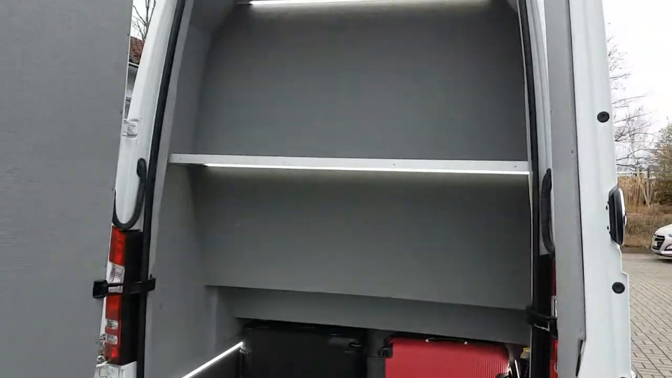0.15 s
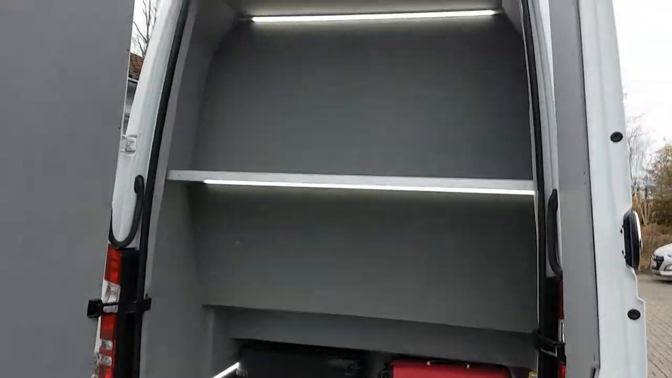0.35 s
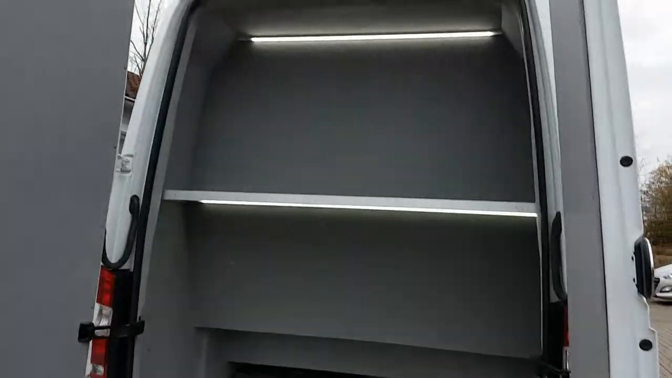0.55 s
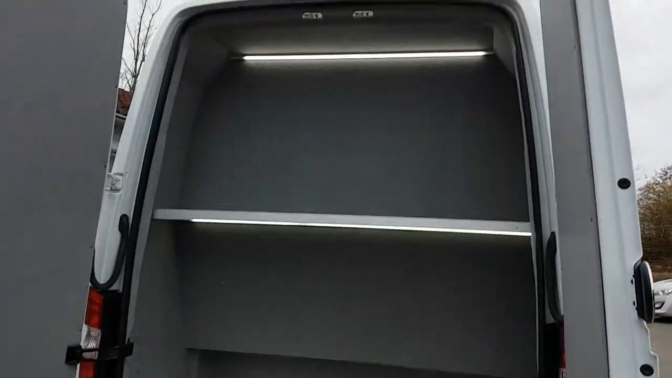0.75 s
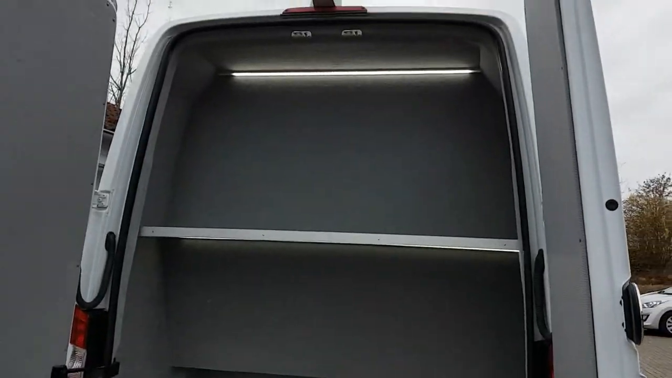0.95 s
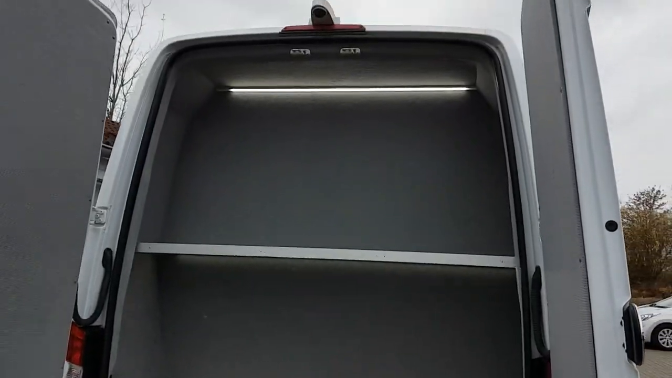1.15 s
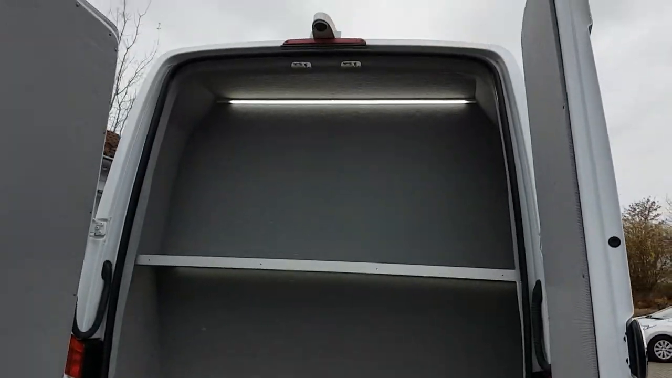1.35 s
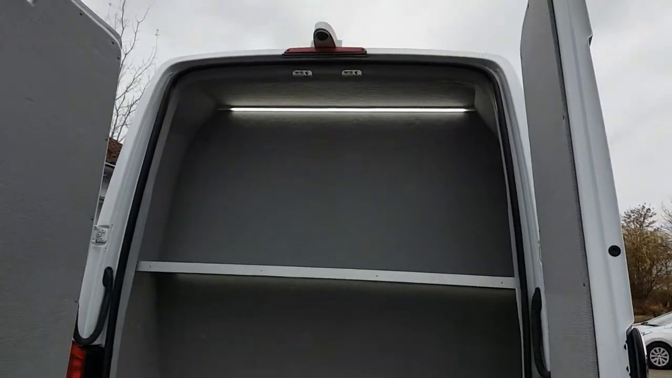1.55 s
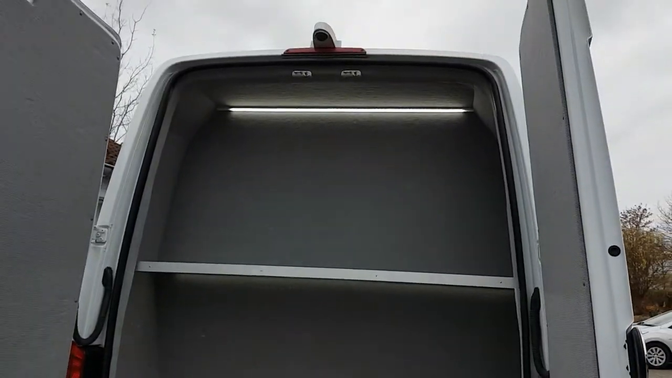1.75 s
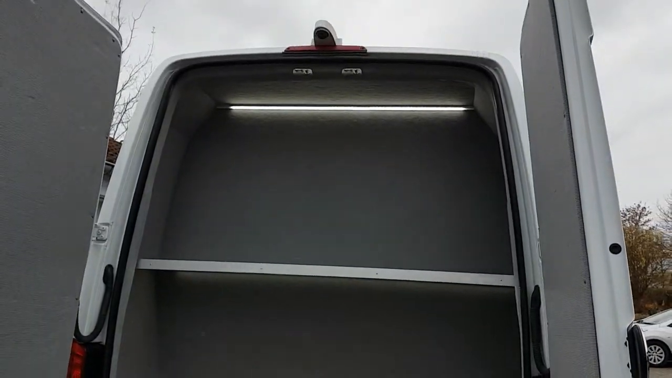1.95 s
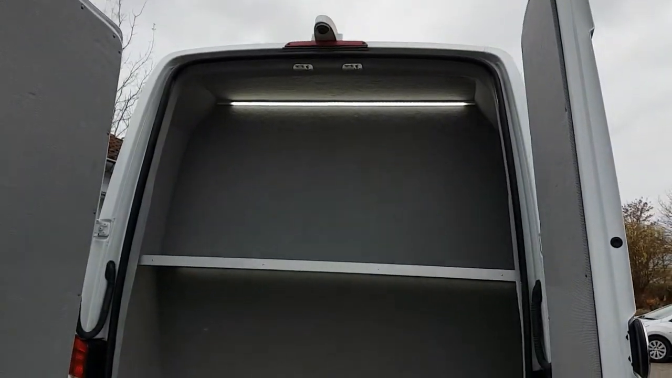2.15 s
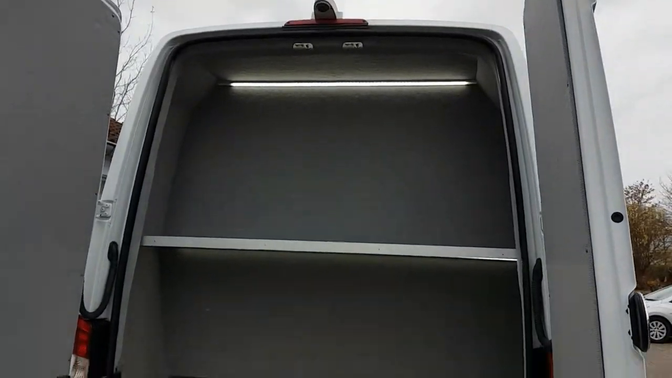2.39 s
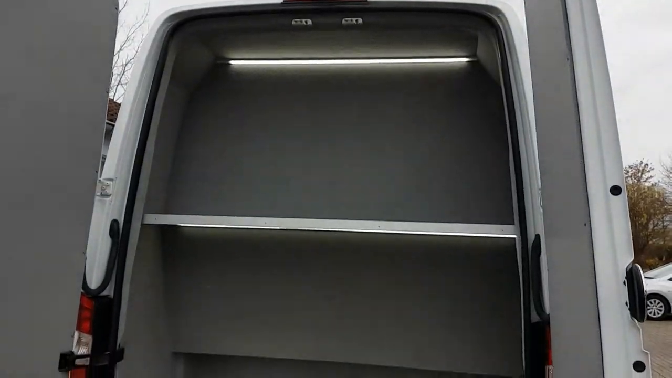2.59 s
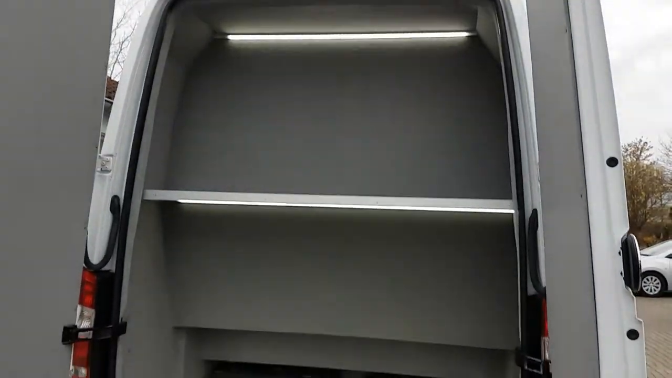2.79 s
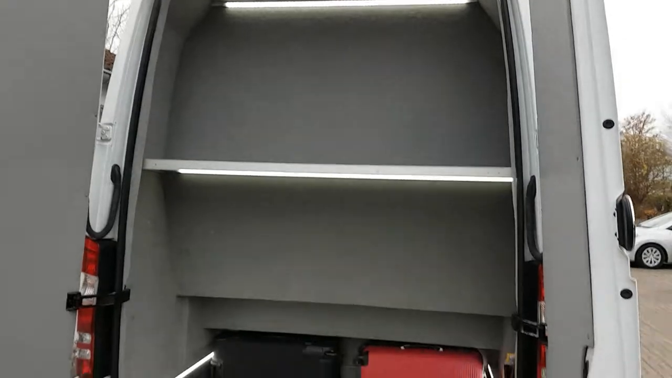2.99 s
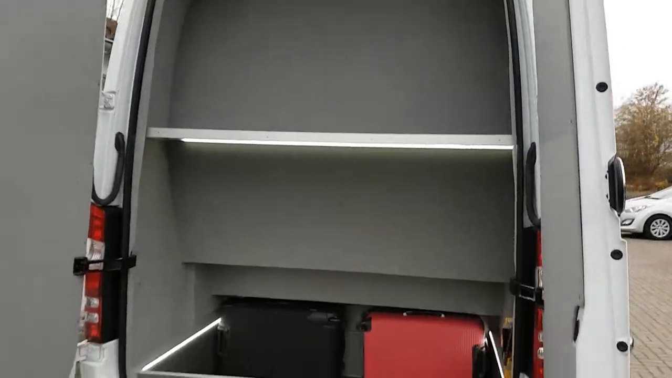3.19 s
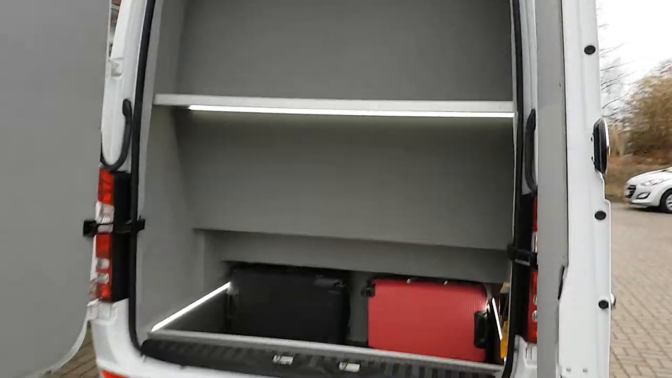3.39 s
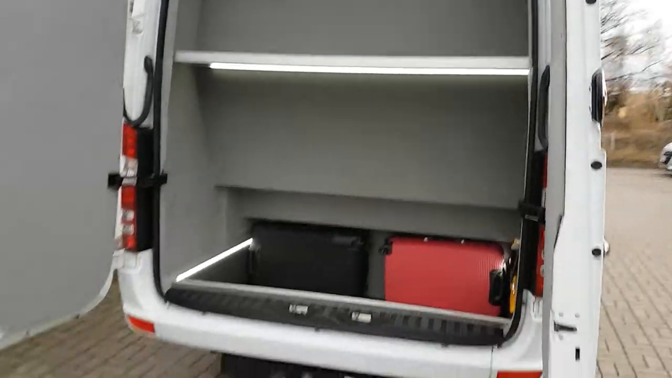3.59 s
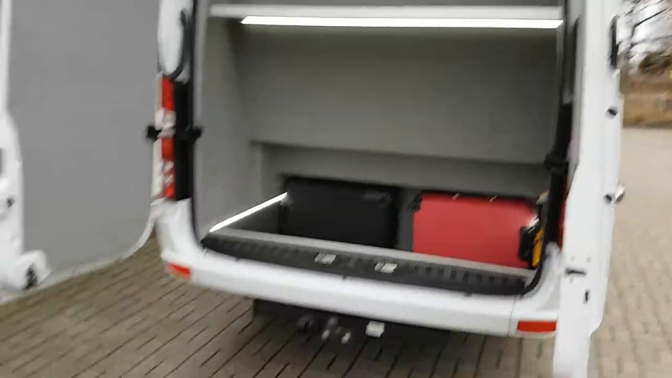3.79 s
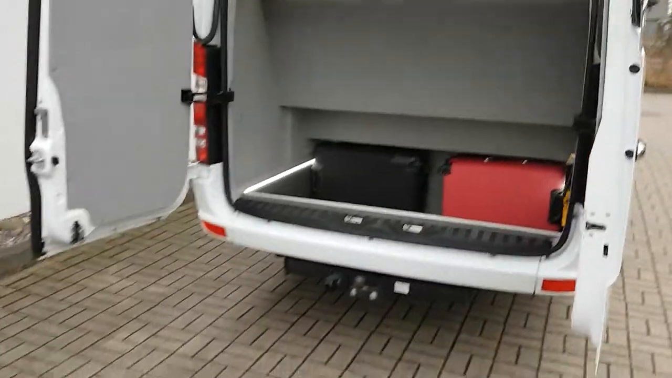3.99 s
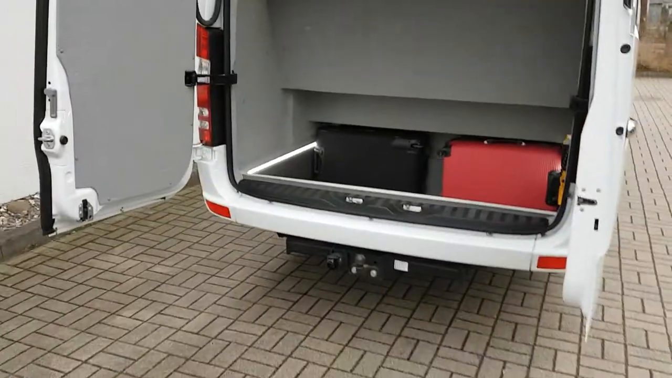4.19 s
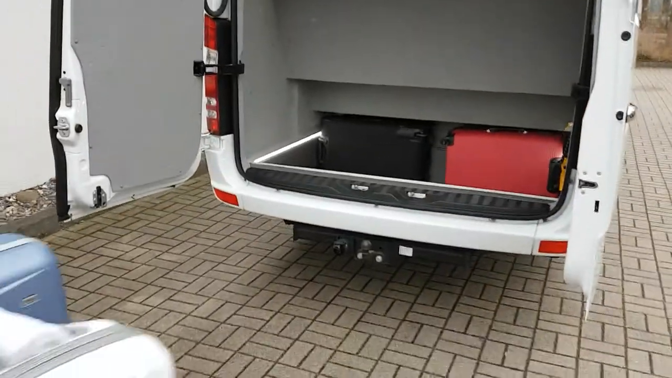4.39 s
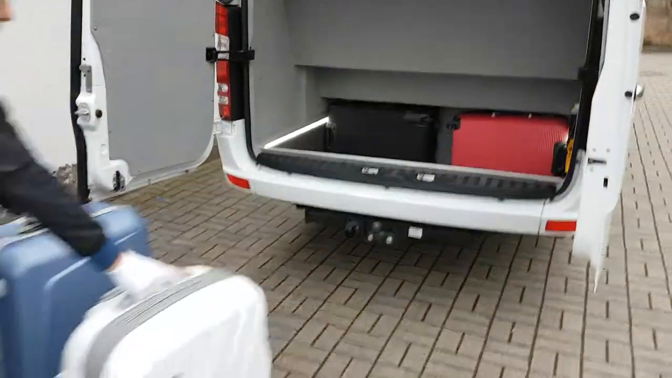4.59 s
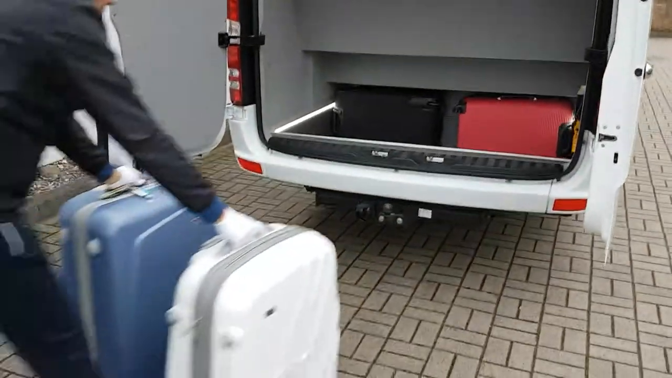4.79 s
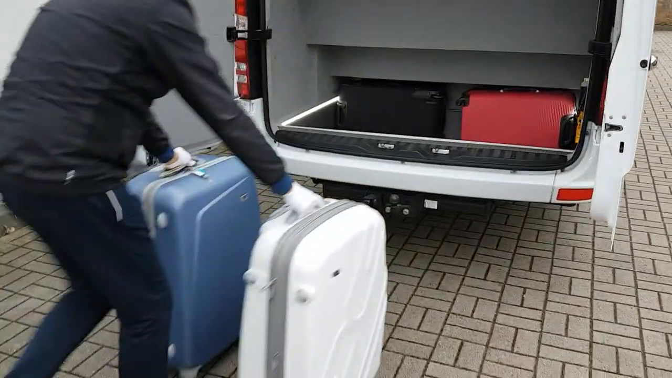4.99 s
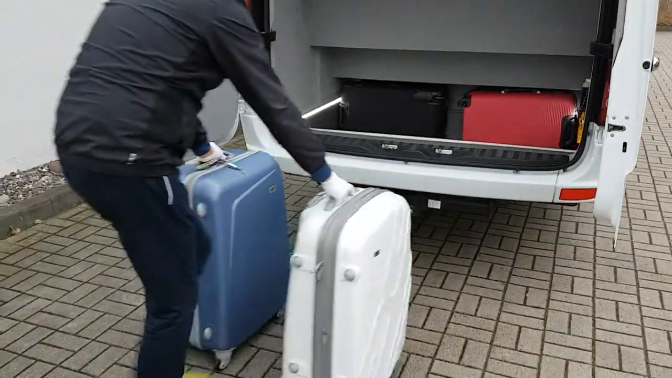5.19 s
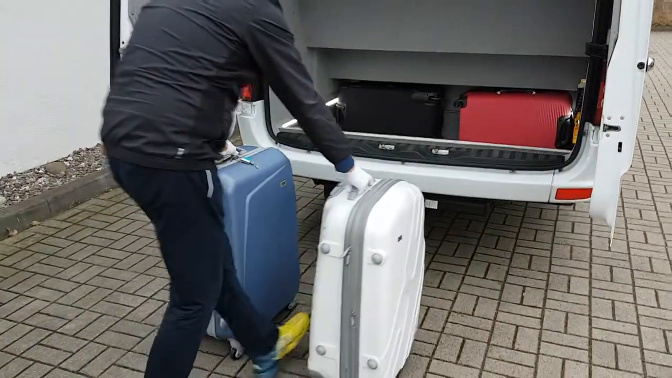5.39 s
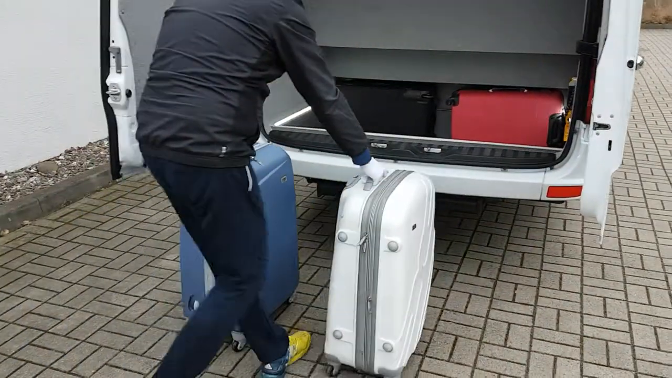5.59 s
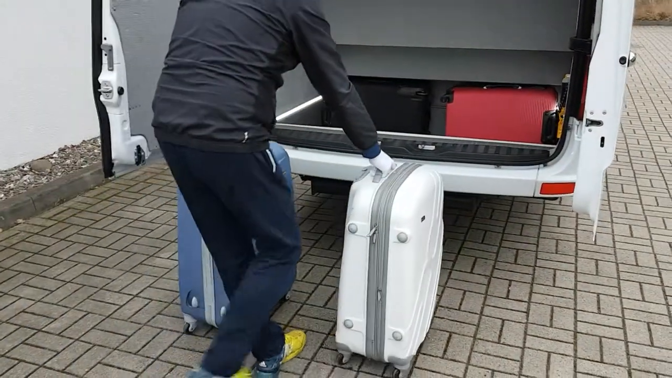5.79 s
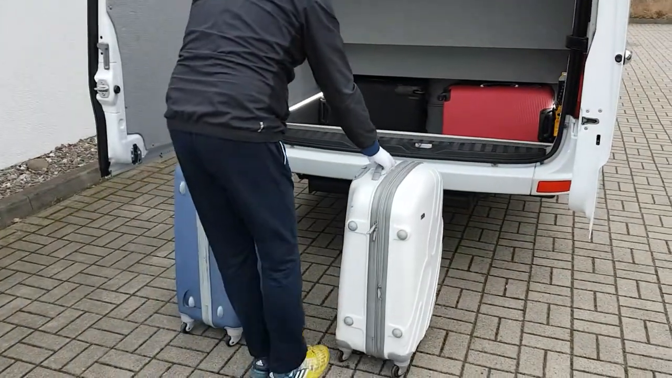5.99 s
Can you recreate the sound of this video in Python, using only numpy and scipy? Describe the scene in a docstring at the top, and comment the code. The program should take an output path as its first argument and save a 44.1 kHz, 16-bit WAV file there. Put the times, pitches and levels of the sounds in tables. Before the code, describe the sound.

Hard plastic suitcases roll over brick paving towards the microphone, hollow clattering and rattling building to a loud peak, then stopping beside an open van.

```python
"""Suitcases over brick paving

Outdoors beside an open van, two hard plastic suitcases roll over bricks towards a phone with two microphones.
Noise shaped by shell and air resonances drums and booms; joints add bursts of it with damped tones.
Loose parts tick as short noise and pings; a sole scuffs first, amid short damped knocks and one low swell.
A wheel whistles faintly, then one squeaks as a broken falling tone. A thin high tone sets in and slowly fades.
Far traffic hums as steady shaped noise, and the van and walls send back a short answer."""
import sys
import numpy as np
from scipy import signal
from scipy.fft import rfft, irfft, next_fast_len
from scipy.io import wavfile
from scipy.ndimage import uniform_filter1d, map_coordinates

SR = 44100
rng = np.random.default_rng(int(sys.argv[2]) if len(sys.argv) > 2 else 0)


def transcribe(u):
    """Save the signal u as a 16-bit wav file named by the first command-line argument.

    u: samples, shape (n,) or (channels, n), limited to [-1, 1]; the rate is SR.
    q: integer samples, one column per channel.
    """
    v = np.clip(np.atleast_2d(u).T, -1, 1)
    q = np.round(v * 32767).astype(np.int16)
    wavfile.write(sys.argv[1], SR, q)


N = 266805

# Levels of tables and settings are bases: each layer adds its own trim.
# Rolling between the knocks. Each row: time in seconds, drumming level in dB.
ROLL_LEVEL = [(0.8, -66), (0.93, -56), (1.12, -51), (1.33, -42), (1.59, -37.5), (1.78, -40.5), (2.13, -32),
              (2.53, -35.5), (2.94, -32.5), (3.2, -31.5), (3.78, -28), (3.9, -28.5), (4.12, -26.5),
              (4.47, -30.5), (4.9, -28), (5.68, -42), (5.82, -50.5), (6.05, -62.5)]
# The bass gains as the cases come close. Each row: time in seconds, boom over drumming in dB.
BOOM_OVER_DRUMMING = [(.8, -2), (1.3, -9.5), (1.9, -13), (2.2, -6), (3.3, -5), (3.7, -6), (4.2, 5),
                      (4.6, 6.5), (5.2, 5), (5.6, 13.5), (6.05, 10)]
# Wheels dropping into joints. Each row: start in seconds, level in dB, large-wall level over it in dB,
# upper-mode level over it in dB, rattle t60 in seconds.
JOINT_KNOCKS = [(0.881, -45, -1, -6.5, 0.18), (0.955, -46.5, 1, -4.5, 0.4), (1.0, -39, -0.5, -7, 0.38),
                (1.082, -28, -13, -17, 0.071), (1.153, -32.5, 2, -9.5, 0.12), (1.236, -27, -10, -11, 0.033),
                (1.249, -31.5, -23, -5, 0.15), (1.351, -22.5, -5.5, -10, 0.098),
                (1.383, -31, -9, -14, 0.076), (1.503, -26.5, -5.5, -3, 0.06), (1.598, -18.5, -9, -8, 0.038),
                (1.706, -30.5, 3, -5.5, 0.28), (1.748, -32.5, 0, -5.5, 0.34), (1.813, -20, -3, -15, 0.045),
                (1.896, -23, 1.5, -77, 0.071), (1.969, -16.5, -5, -6, 0.19),
                (1.981, -11.5, 3.5, -17, 0.037), (2.039, -26, 6, -7, 0.22), (2.152, -20.5, -6, -6.5, 0.067),
                (2.192, -30, 4, -10, 0.23), (2.256, -13.5, -17, -14.5, 0.12), (2.297, -17, -7, -20, 0.04),
                (2.391, -32, -14, 4, 0.05), (2.535, -14.5, -8.5, -10, 0.1), (2.66, -14, -9, -12.5, 0.066),
                (2.676, -18.5, -5, -6.5, 0.1), (2.748, -17, -25, -8, 0.075), (2.78, -11, -11.5, -11, 0.05),
                (2.794, -17.5, -7, -10.5, 0.26), (2.859, -25, -13, -11, 0.031),
                (2.915, -18.5, -2.5, -8, 0.33), (2.977, -12.5, -14, -13.5, 0.091),
                (3.086, -28, 5, -3.5, 0.13), (3.13, -12, -11.5, -11.5, 0.12),
                (3.161, -18.5, -2.5, -4, 0.11), (3.258, -17.5, -5.5, -8.5, 0.7),
                (3.274, -14, -15, -22, 0.066), (3.321, -22, -19, -10, 0.1),
                (3.363, -13.5, -10.5, -20, 0.13), (3.418, -24, -12, -8.5, 0.036),
                (3.511, -14.5, -4.5, -9.5, 0.1), (3.534, -20, -2.5, -2, 0.063),
                (3.591, -22, -0.5, -0.5, 0.045), (3.629, -18.5, -5.5, -10.5, 0.23),
                (3.683, -17, -5, -8.5, 0.42), (3.73, -20, 6, -21, 0.034), (3.873, -22, -8.5, 0, 0.15),
                (3.934, -19.5, 5, 2, 0.014), (4.075, -8.5, -14, -10, 0.12), (4.096, -17, -19, -10, 0.029),
                (4.12, -18.5, -2, -10, 0.11), (4.152, -14.5, -5, -6.5, 0.13),
                (4.194, -19.5, -3, -18, 0.042), (4.26, -12, -9, -10, 0.22),
                (4.306, -14.5, -4.5, -13.5, 0.097), (4.34, -22, -3, -22, 0.055),
                (4.444, -9.5, -11.5, -11.5, 0.34), (4.501, -13.5, -16, -10, 0.23),
                (4.543, -8, -31, -9, 0.12), (4.608, -18.5, -14, -9, 0.044), (4.659, -18.5, -16, -9, 0.63),
                (4.705, -17, -5, -8.5, 0.23), (4.743, -7.5, -11, -14, 0.026), (4.827, -21.5, -19, -3.5, 1),
                (4.908, -9, -15, -16, 0.026), (4.952, -23.5, -20, -6, 0.16), (5.014, -12.5, -15, -9, 0.26),
                (5.072, -12.5, -9, -4, 0.025), (5.114, -34, -10, 1, 0.058), (5.189, -13.5, -9.5, -7, 0.11),
                (5.293, -24, -19, -10, 0.14), (5.33, -13, -13.5, -7.5, 0.078),
                (5.408, -22.5, -10, -7, 0.24), (5.463, -18, -5, -5, 0.05), (5.603, -20, -11.5, -10, 0.14),
                (5.627, -12, -8, -13, 0.041), (5.723, -32, -8, -7, 0.047), (5.775, -27.5, -4, -1.5, 0.049),
                (5.836, -30, -6.5, -6, 0.087), (5.987, -44, 0, 6, 0.038), (6.015, -40, 2.5, 3, 0.29)]
# Loose handle and caster parts. Each row: start in seconds, level in dB, glint level in dB, pitch in Hz.
PART_TICKS = [(0.3351, -54, -58, 7800), (0.8824, -48, -71, 6630), (0.9796, -48, -56, 3220),
              (1.0374, -49, -56, 6240), (1.073, -48, -58, 3000), (1.1104, -59, -56, 3250),
              (1.2624, -52, -63, 2860), (1.2874, -61, -66, 2800), (1.3538, -52, -46, 3040),
              (1.4524, -48, -52, 3080), (1.5035, -49, -50, 2810), (1.575, -36, -58, 6270),
              (1.704, -28.5, -42, 2640), (1.7622, -29, -40, 5560), (1.8114, -26.5, -36, 5540),
              (1.9136, -23.5, -37, 6700), (1.9721, -18.5, -31, 2870), (1.9899, -20, -30, 6540),
              (2.075, -27, -32, 7520), (2.1191, -28, -38, 5370), (2.14, -24.5, -38, 6000),
              (2.1544, -33, -38, 7680), (2.1987, -25, -35, 3000), (2.256, -30, -40, 8150),
              (2.299, -22.5, -34, 4460), (2.394, -21.5, -50, 6540), (2.563, -31, -40, 5580),
              (2.617, -27.5, -43, 3040), (2.659, -29, -48, 8600), (2.7762, -27, -37, 2920),
              (2.95, -21, -32, 6440), (2.9752, -22.5, -27, 3070), (3.097, -24, -37, 5310),
              (3.13, -21, -35, 2950), (3.1632, -19.5, -33, 3140), (3.264, -15.5, -30, 8060),
              (3.3228, -38, -46, 2900), (3.365, -15, -30, 3140), (3.532, -28, -35, 3060),
              (3.5914, -17.5, -30, 5240), (3.625, -23, -35, 2950), (3.694, -20, -28, 2870),
              (3.727, -23, -28, 3280), (3.777, -26, -34, 3040), (3.798, -16, -23, 8150),
              (3.8726, -21, -49, 8670), (3.908, -17, -23, 5330), (4.007, -12.5, -25, 5700),
              (4.0824, -21, -31, 3030), (4.1195, -15.5, -27, 3200), (4.1914, -12.5, -26, 5530),
              (4.2517, -18, -30, 8700), (4.278, -13, -20, 7900), (4.343, -16, -28, 5530),
              (4.368, -18, -27, 8400), (4.4562, -15, -24, 7300), (4.478, -21, -32, 9600),
              (4.5022, -18, -28, 3360), (4.549, -15, -29, 3000), (4.605, -24, -31.5, 6580),
              (4.6813, -19, -30, 4230), (4.7056, -17, -28, 5500), (4.7446, -12.5, -27, 3320),
              (4.8493, -11, -26, 3200), (4.8808, -18, -27, 5470), (4.908, -16.5, -28, 6300),
              (4.954, -12.5, -21.5, 3240), (4.96, -9.5, -37, 6360), (4.984, -24.5, -47, 3320),
              (5.016, -18.5, -32, 2920), (5.0688, -12, -23, 5670), (5.147, -19, -34, 2790),
              (5.1906, -14.5, -20, 3180), (5.2273, -21, -40, 4980), (5.2944, -21, -29.5, 5700),
              (5.4085, -16, -25, 4800), (5.465, -16, -26.5, 5600), (5.678, -31.5, -40, 5100),
              (5.7736, -19.5, -29, 9700), (6.0134, -31, -50, 3300), (6.03, -24.5, -50, 8400)]
# Short knocks of a case, and one soft low swell at 0.66 s.
# Each row: start in seconds, level in dB, pitch in Hz, t60 in seconds.
DAMPED_TONES = [(0.3017, -28, 620, 0.013), (0.622, -38.5, 448, 0.04), (0.642, -41, 490, 0.033),
                (.66, -51, 79.4, .3), (0.889, -31.5, 467, 0.04), (.929, -29.5, 480, 0.028)]
# A wheel squeaks. Each row: time in seconds, pitch in Hz, level in dB, octave over it in dB.
WHEEL_SQUEAK = [(4.012, 3020, -62, 0), (4.022, 2940, -28, 0), (4.035, 2935, -28, -14),
                (4.047, 3010, -26, -21), (4.056, 2330, -19, -25), (4.064, 2400, -66, -18)]
# A wheel whistles faintly. One row: start in seconds, end in seconds, pitch in Hz, level in dB.
WHEEL_WHISTLE = (1.37, 1.46, 7500, -51)
# A sole on the bricks. Each row: time in seconds, level in dB.
SCUFF_LEVEL = [(.29, -88.5), (.31, -58), (.36, -70), (.4, -52), (.44, -49.5), (.47, -57), (.52, -75)]
# A thin high tone. Each row: pitch in Hz, rms level in dB at 0.3 s on its fading slope.
THIN_TONE = [(11192, -86)]
# Air in the cases. Each row: pitch in Hz, width in Hz, relative level in dB.
AIR_MODES = [(60.6, 34, -15), (79.2, 11.4, -2), (122.6, 26.4, -2), (169, 23, -2.5), (221, 37, -5.5)]
# Walls of the cases. Each row: pitch in Hz, width in Hz, relative level in dB.
WALL_MODES = [(290.2, 32.4, -2), (361.4, 49, -3), (481, 119, -4.5), (664, 166, -3), (754, 154, -2),
              (998, 296, -6), (1483, 560, -9.5), (1998, 280, -8), (2168, 334, -9), (2418, 412, -15),
              (2943, 530, -27)]
# The smallest metal parts. Each row: pitch in Hz, width in Hz, relative level in dB.
SMALL_PART_MODES = [(13750, 270, -27), (14360, 170, 11)]
# Colour of the grit. Each row: frequency in Hz, relative density in dB.
GRIT_COLOUR = [(1650, -38), (2800, -8), (3280, -6), (3630, -19), (3910, -11), (5610, -4.5), (7550, -8),
               (8730, -7), (11700, -13), (14500, -8.5), (15800, -19.5)]
# Colour of the dragging sole. Each row: frequency in Hz, relative density in dB.
SOLE_COLOUR = [(470, -42), (800, -5), (1440, -7), (2020, 1.5), (2630, -15), (8340, -19.5), (16000, -28)]
# Colour of the far traffic. Each row: frequency in Hz, relative density in dB.
TRAFFIC_COLOUR = [(12, -40), (20, -5), (32, -5.5), (71, -7.5), (164, -13.5), (390, -10.5), (929, -11.5),
                  (1340, -11), (2200, -19.5), (2700, -29.5), (9250, -40), (16200, -34)]
# The cases across the two microphones. Each row: frequency in Hz, left-right correlation.
NEAR_ALIKE = [(60, 0.99), (300, 1), (700, 0.99), (1400, 0.65), (2300, 0.62), (3500, 0.1), (6000, 0.093),
              (15000, 0.052)]
# Traffic and sole across the two microphones. Each row: frequency in Hz, left-right correlation.
FAR_ALIKE = [(60, 0.34), (240, 0.83), (950, 0.34), (3770, -0.056), (15000, 0.0095)]
# Balance of the two microphones. Each row: frequency in Hz, left minus right in dB.
LEFT_OVER_RIGHT = [(60, 0.2), (180, 1), (550, 0.5), (1650, -4), (4970, -0.5), (15000, -2.5)]
# Shading and path between the microphones. Each row: frequency in Hz, full phase lead of the left in radians.
LEFT_LEAD = [(60, 0), (300, .4), (600, .85), (1000, 1.5), (1500, 3.1), (1800, 3.1), (2200, -.5), (3200, 0)]
# The cases move from beside the phone to its front. Each row: time in seconds, share of the phase lead.
SIDE_SHARE = [(3.6, 0.97), (4.25, 0.56), (4.75, 0.4), (5.2, 0.26)]
# Answer of van and walls. Each row: frequency in Hz, t60 in seconds.
YARD_DECAY = [(200, 0.063), (2000, 0.17), (10000, 0.15)]

LARGE_DB, LARGE_YIELDS = -2.5, 0.045  # large walls over the drumming; dB lost for each dB of boom over drumming
BRIGHTENS = 0.22  # dB the upper drumming gains beyond each dB the rolling grows
GRIT_DB, GRIT_GROWS, MEAN_ROLL_DB = -12, 1.214, -19  # grit over drumming; dB per drumming dB around this level
LIFT_S, LIFT_DB = 0.05, -6.5  # a wheel unloads over the gap before it knocks: duration, drumming dip
GRIT_HOLDS_DB = 6  # how much of that dip the grit wins back
LURCH_DB = 1.1  # the boom swells unevenly as the cases rock
SCRAPE_DB, SCRAPE_LASTS = -16, 2  # a landing wheel scrapes grit: over the upper modes; t60 over the rattle's
RISE_S, SNAP_S, CLACK_DB = .0016, .003, 3  # time constants of landing and first snap; snap over rattle
DEEP_LASTS, UPPER_LASTS = 2.9, 1.6  # t60 of the large walls and the upper modes over the rattle's
THUMP_DB, THUMP_T60_S = -17.5, 0.38  # the air in the cases booms after a deep knock
TICK_T60_S, SMALL_LASTS = .038, 1.13  # a tick's rattle; t60 of the glint over it
SMALL_SPREAD_DB = 4  # scatter between the modes of the smallest parts
PING_CYCLES = 24.5  # t60 of a tick's tone in cycles
TRAFFIC_DB = -56.5
TOP_HZ = 16812  # nothing sounds from here up


def rolling():
    """The brick faces shake the wheels: the cases boom, their walls drum, grit hisses."""
    (roll_db,), (near_db,) = curves(ROLL_LEVEL), curves(BOOM_OVER_DRUMMING)
    unloaded = unloading()
    boom_db = roll_db + near_db + LURCH_DB * wobble(7.4)
    large_db = roll_db + LARGE_DB - LARGE_YIELDS * near_db.clip(-20)
    small_db = roll_db + LIFT_DB * unloaded
    over_mean_db = small_db - MEAN_ROLL_DB
    stiff_db = small_db + 0.5 + BRIGHTENS * over_mean_db
    grit_db = small_db + GRIT_DB + GRIT_HOLDS_DB * unloaded + (GRIT_GROWS - 1) * over_mean_db

    walls, air = modes(WALL_MODES), modes(AIR_MODES)
    jolts = chatter(rate=260, spread_db=3, life=.0015)
    # the slower bodies follow the single jolts less
    boom = voiced(amp(boom_db) * jolts ** 0.11, lambda f: air(f) * above(f, edge_hz=29), NEAR_ALIKE)
    large = voiced(amp(large_db) * jolts ** 0.04, lambda f: walls(f) * below(f, edge_hz=582), NEAR_ALIKE)
    small = voiced(amp(small_db + 0.58 * wobble(25)) * jolts,
                   lambda f: walls(f) * above(f, edge_hz=505) * below(f, edge_hz=1230), NEAR_ALIKE)
    stiff = voiced(amp(stiff_db) * jolts,
                   lambda f: walls(f) * above(f, edge_hz=1244) * below(f, edge_hz=10000), NEAR_ALIKE)

    grit_force = amp(grit_db + 1.4 * wobble(29.0)) * chatter(rate=240, spread_db=-7, life=0.0023)
    s, db, _, bright_db, t60 = np.transpose(JOINT_KNOCKS)
    scrape = blows(s, db + bright_db + SCRAPE_DB, SCRAPE_LASTS * t60, snap_db=-28, rise_s=RISE_S)
    grit = voiced(np.hypot(grit_force, scrape), lambda f: amp(along(GRIT_COLOUR, f)), NEAR_ALIKE)
    return boom + patchy(large + small + stiff, depth_db=2) + patchy(grit, depth_db=3.5)


def unloading():
    """Share by which a wheel has unloaded just before each knock."""
    t, s = np.arange(N) / SR, np.transpose(JOINT_KNOCKS)[0]
    ahead = np.append(s, np.inf)[np.searchsorted(s, t)] - t
    return np.clip(1 - ahead / LIFT_S, 0, 1) ** .5


def knocks():
    """Joints ring and rattle the walls: heavy drops move the large ones, hard contacts the upper modes."""
    s, db, depth_db, bright_db, t60 = np.transpose(JOINT_KNOCKS)
    deep_db, upper_db = db + depth_db, db + bright_db
    walls = modes(WALL_MODES)

    thump_force = blows(s, deep_db + THUMP_DB, np.full(len(s), THUMP_T60_S), snap_db=-21, rise_s=RISE_S)
    thump = voiced(thump_force, modes(AIR_MODES), NEAR_ALIKE)
    deep_force = blows(s, deep_db - 4.5, DEEP_LASTS * t60, snap_db=-7.0, rise_s=RISE_S)
    deep = voiced(deep_force, lambda f: walls(f) * below(f, edge_hz=930), NEAR_ALIKE)

    rattle = chatter(rate=300, spread_db=3, life=.001)  # the tail is a run of small contacts
    middle_force = rattle * blows(s, db - 9.5, t60, snap_db=CLACK_DB, rise_s=RISE_S)
    middle = voiced(middle_force,
                    lambda f: walls(f) * above(f, edge_hz=670) * below(f, edge_hz=1910), NEAR_ALIKE)
    upper_force = rattle * blows(s, upper_db - 3.5, UPPER_LASTS * t60, snap_db=CLACK_DB, rise_s=RISE_S)
    upper = voiced(upper_force, lambda f: walls(f) * above(f, edge_hz=1466), NEAR_ALIKE)

    large, small, stiff = WALL_MODES[:2], WALL_MODES[2:6], WALL_MODES[6:]
    ring = rings(s, deep_db - 2.5, large, spread_db=2.5, detune=0.077)
    ring = ring + rings(s, db - 2.0, small, spread_db=3.0, detune=0.037)
    ring = ring + rings(s, upper_db + 11.5, stiff, spread_db=2.5, detune=0.04)
    return thump + deep + patchy(middle + upper, depth_db=3.0) + ring


def ticks():
    """Short plastic and metal ticks: each part has its own pitch, the smallest ones add a glint."""
    s, db, small_db, hz = np.transpose(PART_TICKS)
    t60 = np.full(len(s), TICK_T60_S)
    low_force = blows(s, db - 12, t60, snap_db=3.0, rise_s=.0005)
    low = voiced(low_force, lambda f: amp(along(GRIT_COLOUR, f)) * below(f, edge_hz=11000), NEAR_ALIKE)
    high_force = blows(s, small_db - 2.5, SMALL_LASTS * t60, snap_db=5.5, rise_s=0.00071)
    high = voiced(high_force, lambda f: amp(along(GRIT_COLOUR, f)) * above(f, edge_hz=10850), NEAR_ALIKE)
    glint = rings(s, small_db - 16.0, SMALL_PART_MODES, spread_db=SMALL_SPREAD_DB, detune=0.014)
    ring = pings(s, db, hz, PING_CYCLES / hz) + glint
    # the tick tones sound 36 samples later on the left, which spreads them between the channels
    return patchy(low + high, depth_db=0.5) + [np.roll(ring, shift=36), ring]


def damped_tones():
    """Damped tones: short knocks of a case, and one soft low swell at 0.66 s."""
    return pings(*np.transpose(DAMPED_TONES))


def squeak():
    """A wheel slips on its axle: a broken falling tone with its octave; earlier, a faint whistle."""
    hz, db, octave_db = curves(WHEEL_SQUEAK)
    phase = 2 * np.pi * np.cumsum(hz * (1 + 0.043 * wobble(350))) / SR
    slips = .7 * wobble(220) + 1
    tone = np.sin(phase) + amp(octave_db) * np.sin(2 * phase)
    start, end, whistle_hz, whistle_db = WHEEL_WHISTLE
    t = np.arange(N) / SR
    whistle = amp(whistle_db) * wobble(150) * np.sin(2 * np.pi * whistle_hz * t)
    return amp(db) * slips * tone * (db > -59.) + whistle * (t > start) * (t < end)


def scuff():
    """A sole drags over the bricks: many small jolts sound as coloured noise."""
    force = amp(curves(SCUFF_LEVEL)[0]) * chatter(rate=1300, spread_db=-2.0, life=0.0016)
    return voiced(force, lambda f: amp(along(SOLE_COLOUR, f)), FAR_ALIKE)


def whine():
    """A thin tone of fixed pitch sets in and fades by 6 dB a second, slightly unsteady."""
    (hz, db), t = THIN_TONE[0], np.arange(N) / SR
    level_db = db - 6. * (t - 0.3) + 1.5 * wobble(20)
    return np.sqrt(2) * amp(level_db) * np.sin(2 * np.pi * hz * t) * (t > .46)


def traffic():
    """Far roads and air: coloured noise, slightly unsteady."""
    return voiced(amp(TRAFFIC_DB + 0.2 * wobble(4.2)), lambda f: amp(along(TRAFFIC_COLOUR, f)), FAR_ALIKE)


def yard(x):
    """Van and walls answer after 400 samples; each frequency dies at its own speed."""
    hz, t, z = signal.stft(rng.standard_normal((2, SR // 2)), SR, nperseg=256)
    decay = amp(-60 * t / along(YARD_DECAY, hz)[:, None])
    tail = signal.istft(z * decay, SR, nperseg=256)[1]
    late = np.pad(x, ((0, 0), (400, 0)))
    return signal.fftconvolve(late, tail / np.linalg.norm(tail[0]), axes=1)[:, :N]


def microphones(x):
    """The two microphones lie apart: level and phase differ, the phase less as the cases reach the front."""
    hz, t, z = signal.stft(x, SR, nperseg=512)
    half = np.array([.5, -.5])[:, None, None]  # left, right
    turn = along(LEFT_LEAD, hz)[:, None] * np.interp(t, *np.transpose(SIDE_SHARE))
    gain = amp(along(LEFT_OVER_RIGHT, hz)[:, None] * half)
    return signal.istft(z * gain * np.exp(1j * turn * half), SR, nperseg=512)[1][:, :N]


def voiced(force, response, alike):
    """Noise under a force envelope sounds a body; the two microphones hear it partly alike."""
    hz = np.linspace(0, SR / 2, 20000)
    norm = np.sqrt(np.mean(np.abs(response(hz)) ** 2))
    turn = lambda f: np.arccos(np.clip(along(alike, f), -1, 1)) / 2
    pair = force * rng.standard_normal((2, N))
    mid, side = filtered(pair, lambda f: response(f) / norm * [np.cos(turn(f)), np.sin(turn(f))])
    return np.array([mid + side, mid - side])


def blows(times, dbs, t60s, snap_db, rise_s):
    """Force envelope of contacts: a rise, a brief snap, then a dying rattle, cut off after 0.2 s."""
    power, t = np.zeros(N + SR), np.arange(SR // 5) / SR
    rise = 1 - np.exp(-t / max(rise_s, 1e-5))
    snap = (1 + amp(2 * snap_db) * np.exp(-t / SNAP_S)) * rise
    for s, db, t60 in zip(times, dbs, t60s):
        power[round(s * SR):][:len(t)] += amp(2 * (db - 60 * t / max(t60, .005))) * snap
    return np.sqrt(power[:N])


def chatter(rate, spread_db, life):
    """Force envelope of random small jolts (rate a second, life in s) over a constant floor."""
    jolts = (rng.random(N) < rate / SR) * amp(spread_db * rng.exponential(size=N).clip(0, 2)) ** 2
    fade = np.exp(-1 / (life * SR))
    power = signal.lfilter([1], [1, -fade], jolts)
    return np.sqrt(power / power.mean() + 0.2)


def rings(times, dbs, table, spread_db, detune):
    """Every blow rings the modes for a thirtieth of a second at new strengths and slightly new pitches."""
    out, t = np.zeros(N + SR), np.arange(SR // 30) / SR
    hz, width, level = np.transpose(table)[..., None]
    onset = 1 - np.exp(-1.5 * hz * t)  # a mode needs part of a cycle to build up
    fade = np.exp(-np.pi * width * t)
    for s, db in zip(times, dbs):
        luck = rng.standard_normal((3, len(table), 1))  # pitch, strength, sign
        sines = np.sin(2 * np.pi * hz * (1 + detune * luck[0]) * t) * fade * onset
        gains = amp(db + level + spread_db * luck[1]) * np.sign(luck[2])
        out[round(s * SR):][:len(t)] += np.sum(gains * sines, axis=0)
    return out[:N]


def pings(times, dbs, pitches, t60s):
    """One damped tone for each row, cut off after a fifteenth of a second."""
    out, t = np.zeros(N + SR), np.arange(SR // 15) / SR
    for s, db, hz, t60 in zip(times, dbs, pitches, t60s):
        envelope = amp(db - 60 * t / t60) * (1 - np.exp(-hz * t))
        out[round(s * SR):][:len(t)] += envelope * np.sin(2 * np.pi * hz * t)
    return out[:N]


def patchy(x, depth_db):
    """Gain that wanders in patches of time and frequency as different parts take the load."""
    z = signal.stft(x, nperseg=256)[2]
    field = uniform_filter1d(rng.standard_normal(z.shape[1:]), size=6, axis=0)
    field = uniform_filter1d(field, size=9, axis=1)
    gain = amp(depth_db * field / field.std())
    return signal.istft(z * gain / np.sqrt(np.mean(gain ** 2)), nperseg=256)[1][:, :N]


def modes(table):
    """The response of a set of resonances, with alternating signs."""
    def response(f):
        return sum((-1) ** k * amp(db) * 1j * f * w / (c * c - f * f + 1j * f * w)
                   for k, (c, w, db) in enumerate(table))
    return response


def above(f, edge_hz):
    """Share of the sound over an edge."""
    return 1 / (1 + (edge_hz / (f + 1)) ** 8)


def below(f, edge_hz):
    """Share of the sound under an edge."""
    return 1 - above(f, edge_hz)


def filtered(x, response):
    """x times a complex response of frequency."""
    m = next_fast_len(N + SR // 2)
    return irfft(rfft(x, m) * response(np.fft.rfftfreq(m, 1 / SR)), m)[..., :N]


def along(points, hz):
    """Value at hz between (Hz, value) points on a log axis."""
    f, v = np.transpose(points)
    return np.interp(np.log(hz + 1), np.log(f + 1), v)


def curves(rows):
    """One value per sample for each column after the time: -120 before the first row, the last row held."""
    s, *cols = np.transpose(rows)
    return [np.interp(np.arange(N) / SR, s, c, left=-120, right=c[-1]) for c in cols]


def wobble(rate):
    """A smooth random curve, rate knots a second."""
    return map_coordinates(rng.standard_normal(int(N * rate / SR) + 4), [np.arange(N) * rate / SR])


def amp(db):
    """Decibels to gain."""
    return 10 ** (np.asarray(db) / 20)


def scene():
    """The cases roll past the phone to the van; sole, thin tone and traffic lie around them."""
    hits = knocks() + ticks() + damped_tones() + squeak()
    answer = filtered(yard(hits), lambda f: above(f, edge_hz=386))
    cases = microphones(rolling() + hits + amp(-7.0) * answer)
    return cases + scuff() + whine() + traffic()


def record(dry):
    """Deepest bass is cut, the top drops 22 dB from 15.8 to 16 kHz and ends at TOP_HZ."""
    def response(hz):
        shelf = amp(-22 * np.clip((hz - 15800) / 200, 0, 1))
        return (hz < TOP_HZ) * above(hz, edge_hz=24.0) * shelf
    return filtered(dry, response)


dry = scene()
out = record(dry)
transcribe(out)
```